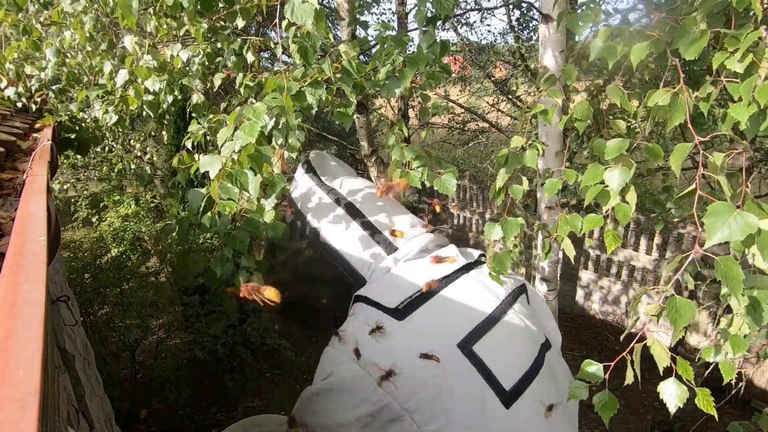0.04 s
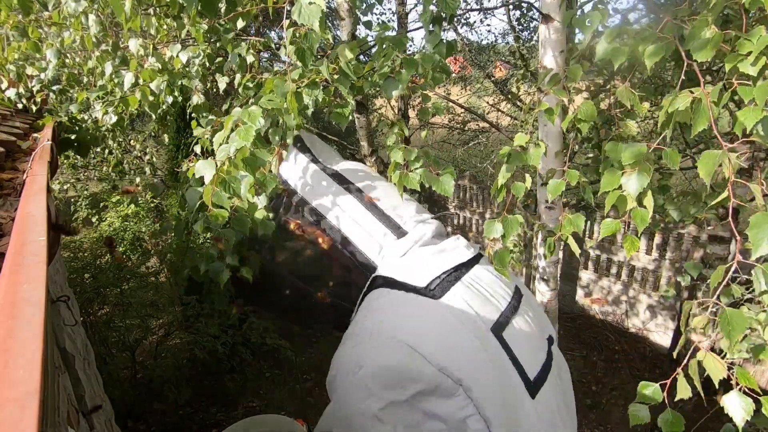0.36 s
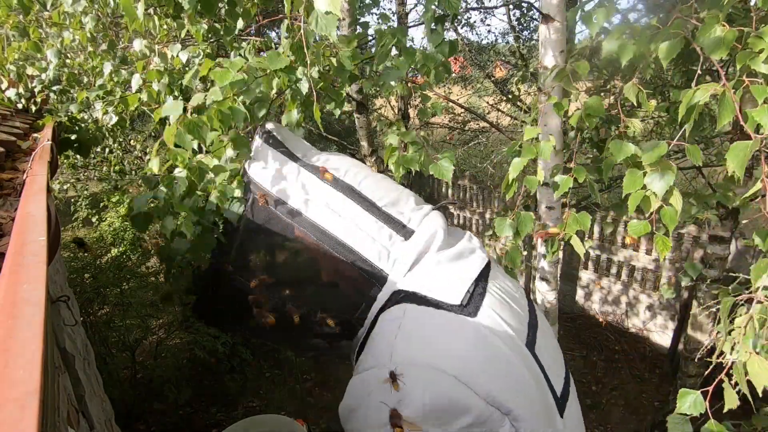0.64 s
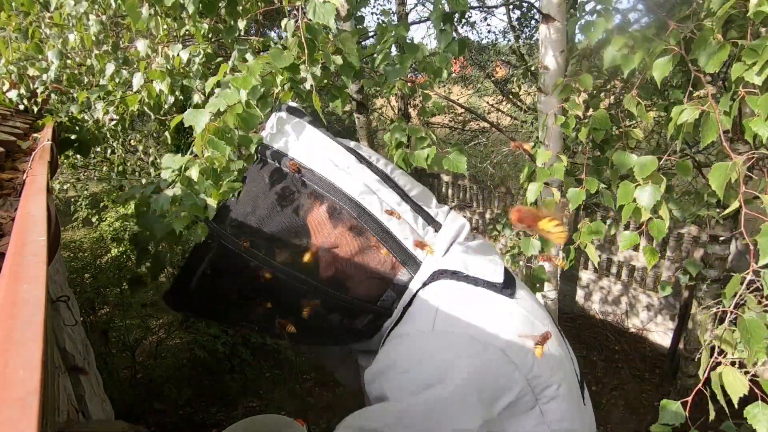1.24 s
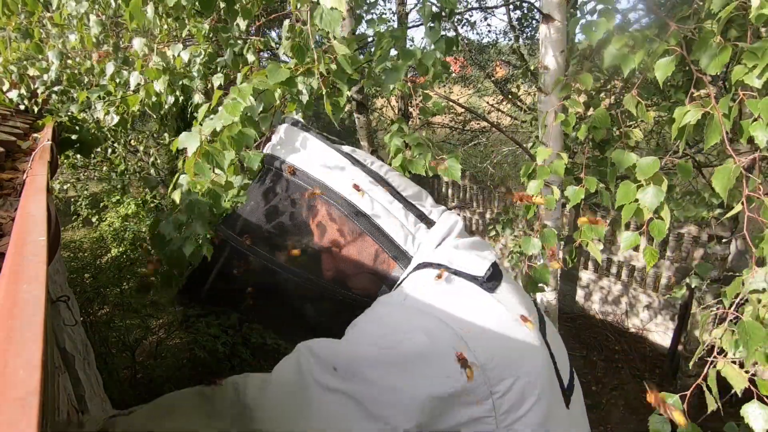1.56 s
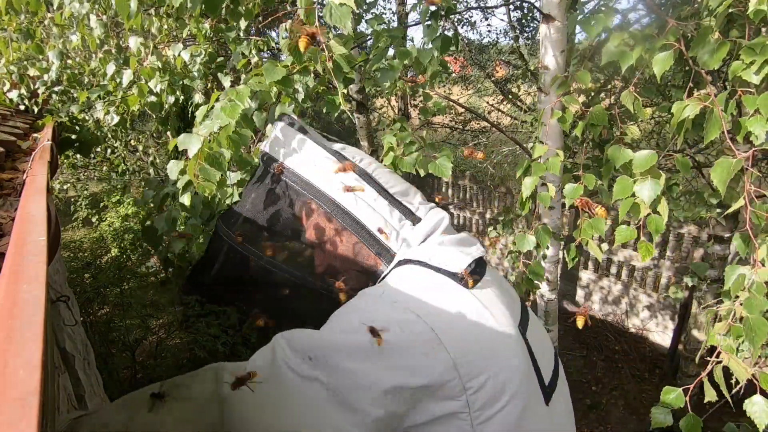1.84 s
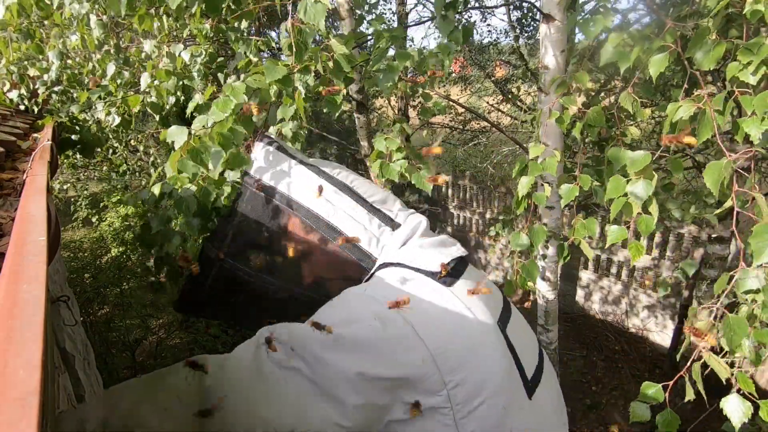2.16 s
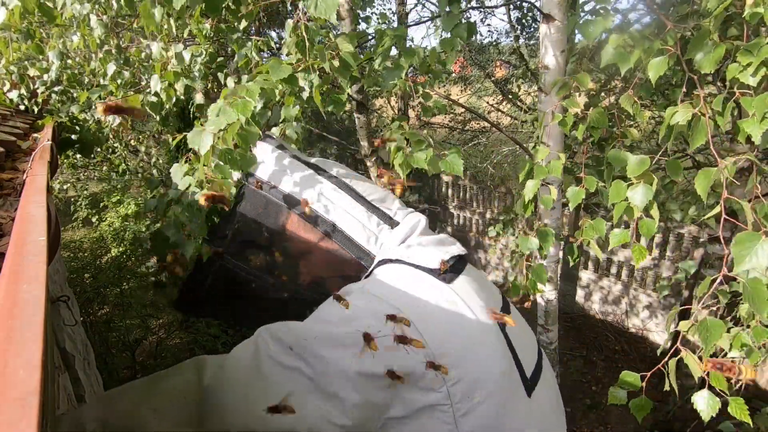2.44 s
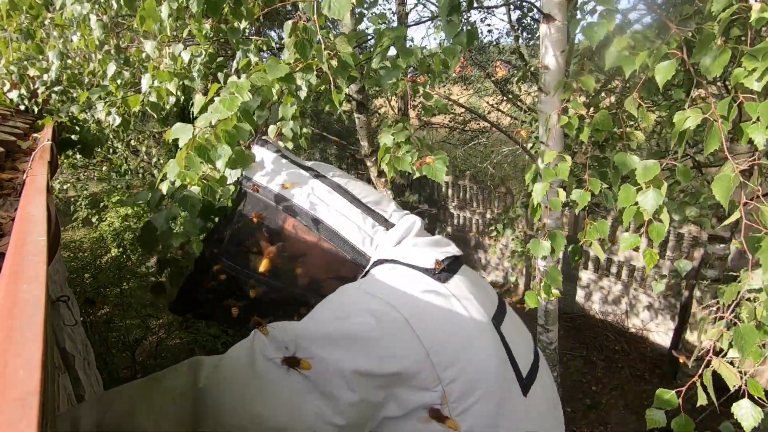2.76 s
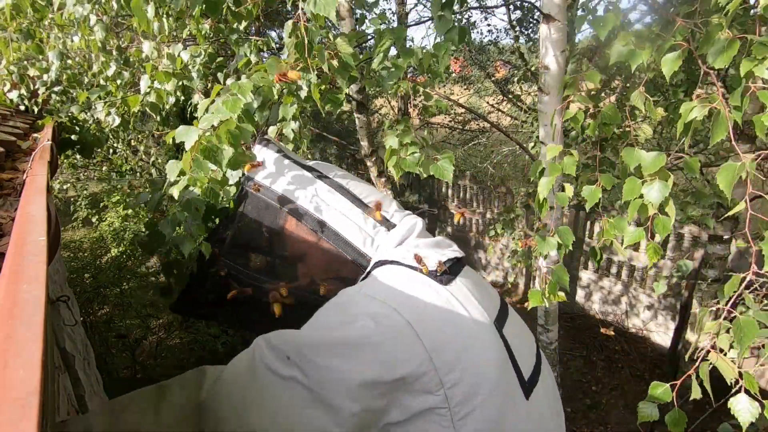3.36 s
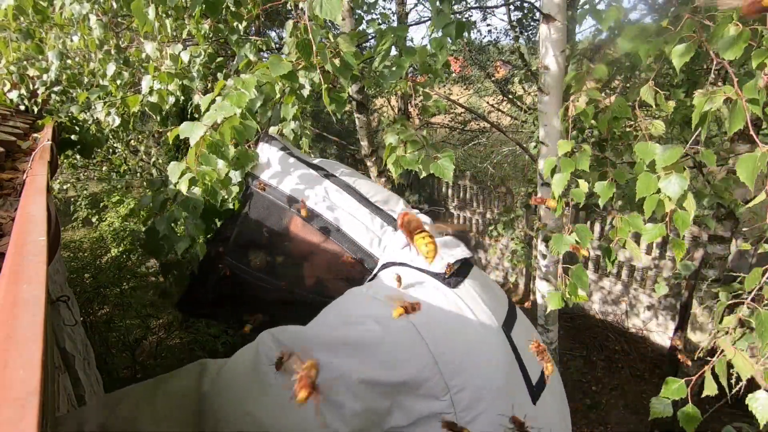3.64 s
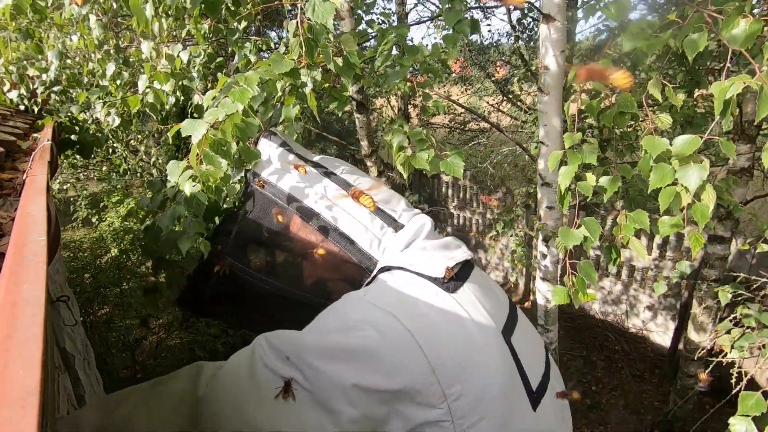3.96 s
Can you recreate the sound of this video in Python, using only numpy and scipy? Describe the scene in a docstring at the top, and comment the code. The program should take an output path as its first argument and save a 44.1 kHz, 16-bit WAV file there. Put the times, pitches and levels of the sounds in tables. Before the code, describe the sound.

A crowd of hornets hums steadily outdoors over faint leaf rustle. Some knock against the microphone at first, then others swoop by in quick close buzzes, fanning it with low puffs and tapping it again toward the end.

```python
"""Hornets at a garden nest

A camera stands at the nest in a leafy garden, with birch leaves hissing behind. A little way off,
the crowd's wingbeats merge into a drone. Single hornets swoop past the microphone, fanning it with
their wings, and some bump or tick against the housing."""
import sys
import numpy as np
from scipy import signal
from scipy.fft import rfft, irfft, next_fast_len
from scipy.io import wavfile
from scipy.ndimage import map_coordinates

SR = 44100
rng = np.random.default_rng(int(sys.argv[2]) if len(sys.argv) > 2 else 0)


def output_pcm(signal):
    """Save a mono or channel-first signal as 16-bit PCM at the path in sys.argv[1].

    Samples are clipped to [-1, 1] before scaling.
    """
    pcm = np.clip(np.atleast_2d(signal).T, -1, 1) * 32767
    wavfile.write(sys.argv[1], SR, np.round(pcm).astype(np.int16))


N = 176400
T = np.arange(N) / SR


def amp(db):
    """Decibels to gain."""
    return 10 ** (np.asarray(db) / 20)


def unit(x):
    """Scale to rms 1."""
    return x / np.sqrt(np.mean(x ** 2) + 1e-20)


def gain_at(spectrum, hz):
    """Gain read from (freq_hz, level_db) rows on a log frequency axis."""
    freq_hz, level_db = np.transpose(spectrum)
    return amp(np.interp(np.log(hz + 1), np.log(freq_hz + 1), level_db))


def curve(rows):
    """Read (time_s, value) rows at every sample."""
    return np.interp(T, *np.transpose(rows))


def swells(rows):
    """Bell-shaped swells from (peak_s, level_db, width_s) rows."""
    return sum(amp(db) * np.exp(-((T - peak_s) / width_s) ** 2 / 2) for peak_s, db, width_s in rows)


def strike(start_s, t60_s, attack_s):
    """An envelope with a quick rise and an exponential fall."""
    t = np.maximum(T - start_s, 0)
    return (1 - np.exp(-t / attack_s)) * amp(-60 * np.minimum(t / t60_s, 2))


def wobble(knots_per_s):
    """A smooth random curve around zero."""
    knots = rng.standard_normal(1024)
    return np.interp(T, T[::64], map_coordinates(knots, [T[::64] * knots_per_s], mode="wrap"))


def filtered(x, response):
    """Filter x by a gain given as a function of frequency."""
    size = next_fast_len(N + SR // 4)
    return irfft(rfft(x, size) * response(np.fft.rfftfreq(size, 1 / SR)), size)[..., :N]


def noise(spectrum):
    """Coloured noise of rms 1."""
    return unit(filtered(rng.standard_normal(N), lambda hz: gain_at(spectrum, hz)))


def burst(length_s, t60_s):
    """White noise that dies away exponentially."""
    t = np.arange(int(length_s * SR)) / SR
    return rng.standard_normal(len(t)) * amp(-60 * t / t60_s)


def wing_tone(beats, spectrum, pitch_hz, lowest, smear):
    """A wing cycle from the lowest harmonic up; little phase smear leaves one sharp snap per beat."""
    harmonics = np.arange(lowest, 40)
    grid = np.linspace(0, 1, 513)
    phases = np.outer(harmonics, grid) + smear * rng.random((len(harmonics), 1))
    cycle = np.sqrt(2) * gain_at(spectrum, harmonics * pitch_hz) @ np.cos(2 * np.pi * phases)
    return np.interp(beats % 1, grid, cycle)


def strokes(beats, depth):
    """An envelope that swells once per wingbeat."""
    return unit(np.exp(depth * np.cos(2 * np.pi * beats)))


FLUTTER_HZ = 1.2  # depth of the wingbeat's fast jitter
TWIST_DB, TWISTS_PER_S = 2.5, 32  # loudness flickers as each hornet twists in the air
# The drone as heard; it ducks after the opening knock, recovers, then rises and falls: time_s, level_db
DRONE_LEVEL = [(0, -39.5), (.3, -43.5), (.7, -40), (.85, -39.5), (1.45, -36), (1.68, -38.5), (1.8, -35.5),
               (2.05, -38), (2.35, -35), (2.7, -34.5), (3.0, -33.5), (3.22, -35.5), (3.5, -36.5),
               (3.65, -32.5), (4.0, -41)]
# Wingbeat harmonics from a little way off: freq_hz, level_db
FAR_TONE = [(126, -4.5), (252, 2.5), (380, -8.5), (505, -11.5), (640, -14), (900, -21), (1500, -24),
            (3000, -38), (5000, -30)]
# Air torn by the wings, far or near: freq_hz, density_db
WING_RASP = [(200, 8), (450, 1.5), (900, -2), (1700, -6), (3400, -9), (4800, -19.5), (6000, -26),
             (7700, -25), (10500, -42.5), (15500, -41)]


def crowd(count=7, wingbeat_hz=125.6, spread_hz=6, wander_hz=4.8, roam_db=2.5):
    """Several hornets roam at middle distance, each on its own wandering wingbeat."""
    drone, rasp_power = np.zeros(N), np.zeros(N)
    for offset in np.linspace(-1, 1, count):
        pitch_hz = wingbeat_hz + spread_hz * offset + wander_hz * wobble(7) + FLUTTER_HZ * wobble(45)
        beats = np.cumsum(pitch_hz) / SR + rng.random()
        gain = amp(roam_db * wobble(4.97) + TWIST_DB * wobble(TWISTS_PER_S))
        drone += gain * wing_tone(beats, FAR_TONE, wingbeat_hz, lowest=1, smear=0.89)
        rasp_power += (gain * strokes(beats, depth=0.6)) ** 2
    rasp = unit(np.sqrt(rasp_power) * noise(WING_RASP))
    return amp(curve(DRONE_LEVEL)) * (unit(drone) + amp(-8.5) * rasp)


# Rustle of the birches behind the nest: time_s, level_db
LEAF_LEVEL = [(0, -58), (.05, -46), (.13, -66.5), (.55, -67), (.8, -58), (1.2, -60.5), (1.27, -57.5),
              (1.43, -58.5), (1.47, -45), (1.56, -53.5), (2.0, -63.5), (2.42, -61), (2.49, -46.5),
              (2.53, -59), (2.8, -55.5), (3.8, -55.5), (3.94, -51), (4.0, -62.5)]
# Colour of that rustle: freq_hz, density_db
LEAF_SPECTRUM = [(300, 10.5), (1500, 8.5), (3500, 10.5), (4800, 0), (5800, -7), (7500, -3.5), (9600, -20),
                 (10800, -10.5), (15500, -25)]
# Air stirring in the garden: freq_hz, density_db
AIR_SPECTRUM = [(15, -10), (45, -6), (90, 3), (180, 11), (400, 4.5), (1000, -11), (4000, -40),
                (15000, -46.5)]
# Swells of fine high hiss: peak_s, level_db, width_s
HISS_SWELLS = [(1.36, -66.5, 0.12), (1.61, -63, 0.061), (1.78, -71, 0.12), (3.84, -53.5, 0.011),
               (3.94, -59, 0.034)]
# Colour of that hiss: freq_hz, density_db
HISS_SPECTRUM = [(3500, -24), (5500, 1.5), (8000, 1.5), (10000, -1.5), (11000, -14), (15500, -26.5)]


def garden():
    """In the background, leaves rustle over a low stir of air and a high hiss swells now and then."""
    leaves = amp(curve(LEAF_LEVEL) + 3.2 * wobble(70)) * noise(LEAF_SPECTRUM)
    air = amp(-51.5 + 5.17 * wobble(7.66)) * noise(AIR_SPECTRUM)
    hiss = (swells(HISS_SWELLS) + amp(-74.5)) * noise(HISS_SPECTRUM)
    return leaves + air + hiss


# Colour of tiny wing clicks around the nest: freq_hz, gain_db
CRACKLE_SPECTRUM = [(1500, -12), (4000, 1), (8000, 6), (10500, -2.5), (13500, -9), (15500, -9)]


def wing_crackle(clicks_per_s=28):
    """Wings click faintly on leaves and cloth at random moments, stronger when the drone is loud."""
    hits = rng.random(N) < clicks_per_s / SR
    strength = amp(-56.5 + 5.5 * np.clip(rng.standard_normal(N), -2, 2))
    clicks = signal.fftconvolve(hits * strength, burst(length_s=0.01, t60_s=0.0034))[:N]
    return unit(amp(curve(DRONE_LEVEL))) * filtered(clicks, lambda hz: gain_at(CRACKLE_SPECTRUM, hz))


# Upper wingbeat harmonics at close range: freq_hz, level_db
NEAR_TONE = [(380, -14), (505, -18.5), (640, -24.5), (900, -28.5), (1300, -36), (2500, -52), (5000, -59)]
# Passes by the microphone (hum is the fundamental, edge the upper harmonics):
# closest_s, level_db, approach_s, retreat_s, wingbeat_hz, hum_db, rasp_db, edge_db
FLY_BYS = [(0.081, -27, 0.0058, 0.006, 157, 8, -7.5, -2), (0.108, -14, 0.0081, 0.0059, 125, -19, -28, -0.5),
           (0.149, -16.5, 0.0042, 0.0071, 116, -15, -38, -5),
           (0.225, -21, 0.008, 0.0059, 110.2, -10, -20.5, -14),
           (0.333, -32.5, 0.016, 0.04, 117, -8, -20, -6), (.398, -30, 0.0046, 0.0094, 119, -5.5, -19, -20),
           (0.621, -39.5, 0.03, 0.0069, 122.2, -5, -29, -17),
           (0.833, -37, 0.045, 0.018, 133.8, -4.5, -10, -5),
           (.92, -41.5, 0.0273, 0.012, 126, 5.5, -8.5, 11), (1.0, -30, 0.036, 0.0076, 128.1, -18, -18, -19),
           (1.181, -42.5, 0.029, 0.027, 120.2, -3.5, -35, -8),
           (1.336, -38.5, 0.012, 0.01, 128, 2.5, -27, -4),
           (1.597, -26.5, 0.017, 0.011, 126.5, 7.5, -24, 8.5),
           (1.615, -16.5, 0.0083, 0.0096, 124.7, -6, -26, -3.5),
           (2.204, -30.5, 0.024, 0.015, 124, -28, -22, -4.5),
           (2.319, -30.5, 0.036, 0.027, 129.7, -3, -23, -6), (2.44, -25.5, 0.032, 0.016, 121.2, -1, -13, 1),
           (2.599, -26.5, 0.013, 0.012, 129, -2.5, -17, -10),
           (2.688, -29, 0.012, 0.016, 122, -27, -16.5, -2), (2.86, -32, .02, 0.035, 122.7, -4.5, -24, 2),
           (2.94, -27, 0.012, 0.019, 127.2, 3.5, -36, 5), (3.022, -20.5, 0.021, 0.011, 129.5, -4, -20, 0),
           (3.308, -25, 0.009, 0.0075, 121.2, -7, -15.5, 0.5),
           (3.333, -35, 0.0096, 0.013, 149.5, -9, -10, 11), (3.612, -27, 0.015, .015, 120.5, -5.5, -11, 0),
           (3.672, -29, 0.01, 0.0096, 126.9, -3, -16, -7), (3.81, -30.5, 0.021, 0.072, 128, -14, -15, -12),
           (3.861, -28, 0.0093, 0.01, 120, 2.5, -16.5, -10),
           (3.948, -23, 0.015, 0.0099, 126.4, -3.5, -10, 1.5),
           (3.995, -26, 0.018, .03, 129.2, -20, -17.5, -1)]


def fly_bys(doppler_hz=3.8, beam_db=2, reach_s=0.3):
    """Each hornet nears the microphone, swells and leaves; its pitch sags and its tone dulls."""
    out, rasp = np.zeros(N), noise(WING_RASP)
    for closest_s, db, approach_s, retreat_s, wingbeat_hz, hum_db, rasp_db, edge_db in FLY_BYS:
        near = abs(T - closest_s) < reach_s
        t = T[near] - closest_s
        path = t / np.where(t < 0, approach_s, retreat_s)
        distance = np.hypot(1, path / np.sqrt(2))  # 1 at the closest point
        pitch_hz = wingbeat_hz - doppler_hz * np.tanh(path / 2) + FLUTTER_HZ * wobble(60)[near]
        beats = np.cumsum(pitch_hz) / SR + rng.random()
        tone = [(hz, level + np.interp(hz, [230, 570], [0, edge_db])) for hz, level in NEAR_TONE]
        beam = amp(-beam_db * np.tanh(path))  # upper harmonics are stronger ahead than behind
        edge = beam * wing_tone(beats, tone, wingbeat_hz, lowest=3, smear=0.42)
        twist = amp(TWIST_DB * wobble(TWISTS_PER_S)[near] / 2)
        octave = twist * np.sqrt(2) * np.cos(4 * np.pi * beats + 1)
        buzz = octave + edge + amp(rasp_db) * rasp[near] * strokes(beats, depth=0.46)
        hum = amp(hum_db) * np.sqrt(2) * np.sin(2 * np.pi * beats)
        fade = np.cos(np.pi / 2 * t / reach_s) ** 2
        out[near] += amp(db) * (buzz / distance ** 1.56 + hum / distance ** 1.46) * fade
    return out


# Bodies hitting the camera, right by the microphone: start_s, scuff_db, scuff_t60_s, thump_db
BUMPS = [(0.0744, -12.5, 0.095, -9.5), (0.0853, -17.5, 0.043, -9.5), (0.127, -31, 0.84, -37),
         (0.184, -32, 0.051, -31), (0.311, -31.5, 0.067, -28.5), (0.397, -34, 0.021, -45),
         (.455, -33, 0.034, -54), (3.034, -24.5, 0.069, -23), (3.315, -25, 0.03, -33),
         (3.421, -31, 0.024, -59), (3.841, -28, 0.043, -33)]
# Colour of a scuff on the housing: freq_hz, density_db
SCUFF_SPECTRUM = [(60, -17), (170, 17), (330, 6), (650, 4), (900, -9.5), (1200, -10.5), (1600, -10.5),
                  (2100, -10.5), (2800, -18), (4200, -23.5), (5800, -35.5), (8000, -44), (14000, -69)]
# The housing's low modes: pitch_hz, level_db, t60_s
HOUSING_MODES = [(220, -7.5, 0.25), (255.5, 8.5, 0.1), (440, -7.5, 0.052)]


def bumps(sag_share=0.14, sag_s=0.012):
    """A body scuffs the housing and rings its modes, which start sharp and sink to their resting pitch."""
    t = np.arange(SR // 4) / SR
    sagging = t + sag_share * sag_s * (1 - np.exp(-t / sag_s))
    ring = sum(amp(db - 60 * t / t60_s) * np.sin(2 * np.pi * hz * sagging)
               for hz, db, t60_s in HOUSING_MODES)
    ring *= 1 - np.exp(-t / 0.0034)  # soft onset
    scuff_level, thumps = np.zeros(N), np.zeros(N + SR)
    for start_s, scuff_db, scuff_t60_s, thump_db in BUMPS:
        scuff_level += amp(scuff_db) * strike(start_s, scuff_t60_s, attack_s=0.0006)
        thumps[round(start_s * SR):][:len(t)] += amp(thump_db) * ring
    return scuff_level * noise(SCUFF_SPECTRUM) + thumps[:N]


# Light taps on the camera: start_s, level_db, pitch_hz
TICKS = [(0.0755, -25.5, 2610), (0.087, -34.5, 4630), (.4, -45, 4700), (.457, -51, 6170),
         (1.247, -48, 8700), (1.263, -49, 7500), (1.776, -50, 7140), (2.098, -53, 7800),
         (2.479, -43.5, 3700), (2.487, -47, 4500), (2.502, -50, 7400), (2.599, -44, 5460),
         (2.669, -51, 5000), (3.023, -43.5, 7250), (3.318, -29, 3960), (3.318, -36.5, 2050),
         (.459, -37, 1930), (3.84, -30, 1860), (3.844, -33, 1140), (3.32, -35, 7500), (3.408, -49, 7900),
         (3.415, -44, 7700), (3.833, -35, 4600), (3.8427, -27, 4530), (3.843, -30.5, 7450),
         (3.926, -45, 6960)]


def ticks(bandwidth_share=0.3, dull_above_hz=10400, boost_db=3):
    """Legs and wing tips tap the housing, each a short scratch of noise around one pitch."""
    out = np.zeros(N)
    for start_s, db, pitch_hz in TICKS:
        scratch = burst(length_s=0.05, t60_s=0.0095)
        resonance = signal.iirpeak(pitch_hz, 1 / bandwidth_share, SR)
        tick = signal.lfilter(*resonance, signal.lfilter(*resonance, scratch))
        tick = signal.lfilter(*signal.butter(2, dull_above_hz, fs=SR), tick)
        out[round(start_s * SR):][:len(tick)] += amp(db + boost_db) * tick / abs(tick).max()
    return out


# Puffs of air on the microphone: peak_s, level_db, width_s
WASH_PUFFS = [(.2, -39.5, 0.04), (.34, -31, 0.023), (.72, -40.5, 0.014), (1.63, -25, 0.023),
              (1.91, -35.5, 0.012), (2.49, -36, 0.061), (3.048, -24, 0.015), (3.775, -36, 0.021),
              (3.87, -37.5, 0.025), (3.97, -44, 0.019)]
# Colour of their rumble: freq_hz, density_db
WASH_SPECTRUM = [(15, -13), (35, -6.5), (60, 12.5), (110, 4), (200, -2.5), (500, -15), (1200, -58),
                 (4000, -67)]


def wing_wash():
    """The closest wings fan the microphone with short, low puffs of air."""
    return noise(WASH_SPECTRUM) * swells(WASH_PUFFS)


# Wings pushing air straight at the microphone: start_s, level_db, pitch_hz
PUSHES = [(1.629, -19, 60), (3.038, -16, 47.7)]


def air_pushes(t60_s=0.081, boost_db=5.5):
    """One or two slow pressure cycles as a hornet brushes past the microphone port."""
    out = np.zeros(N)
    for start_s, db, pitch_hz in PUSHES:
        pressure = np.sin(2 * np.pi * pitch_hz * (T - start_s))
        out += amp(db + boost_db) * strike(start_s, t60_s, attack_s=0.0036) * pressure
    return out


# Width of the stereo picture as heard: time_s, side_gain_db
STEREO_WIDTH = [(0, -62), (.85, -38), (1.2, -19), (1.55, -13), (1.63, -7), (1.72, -12), (2.1, -33),
                (2.6, -49), (4.0, -50)]
# Colour of the side signal against the mid: freq_hz, gain_db
SIDE_SPECTRUM = [(30, -5), (100, -21.5), (260, -20.5), (600, -4), (1200, 6.5), (2500, -6), (5000, 4.5),
                 (9000, 2)]
# Wash that strikes the two microphone ports unequally: peak_s, level_db, width_s
PORT_PUFFS = [(1.626, -19.5, 0.018)]


def stereo_side(mid):
    """The stereo picture is nearly mono and widens briefly around 1.6 s; one puff lands unevenly."""
    scatter = burst(length_s=0.05, t60_s=0.04)
    diffuse = signal.fftconvolve(mid, scatter / np.linalg.norm(scatter))[:N]
    spread = filtered(diffuse, lambda hz: gain_at(SIDE_SPECTRUM, hz))
    return amp(curve(STEREO_WIDTH)) * spread + swells(PORT_PUFFS) * noise(WASH_SPECTRUM)


def scene():
    """The nest from the camera's position, mixed from mid and side to left and right."""
    mid = crowd() + garden() + wing_crackle() + fly_bys() + bumps() + ticks() + wing_wash() + air_pushes()
    side = stereo_side(mid)
    return np.array([mid + side, mid - side])


def record(dry):
    """The camera keeps nothing above its band limit."""
    return filtered(dry, lambda hz: hz < 15650)


dry = scene()
out = record(dry)
output_pcm(out)
```